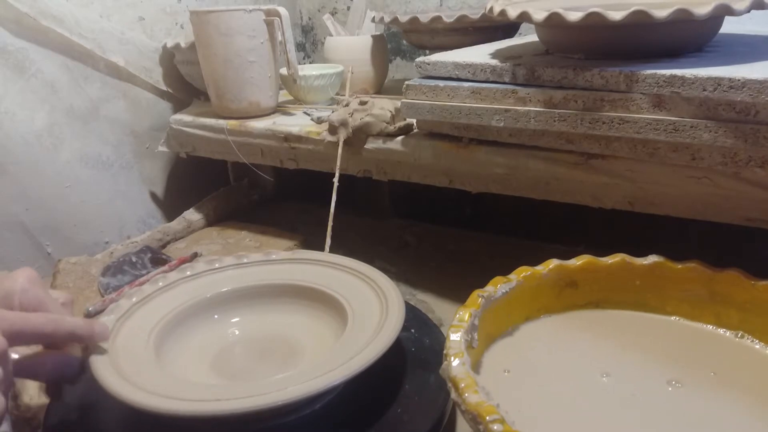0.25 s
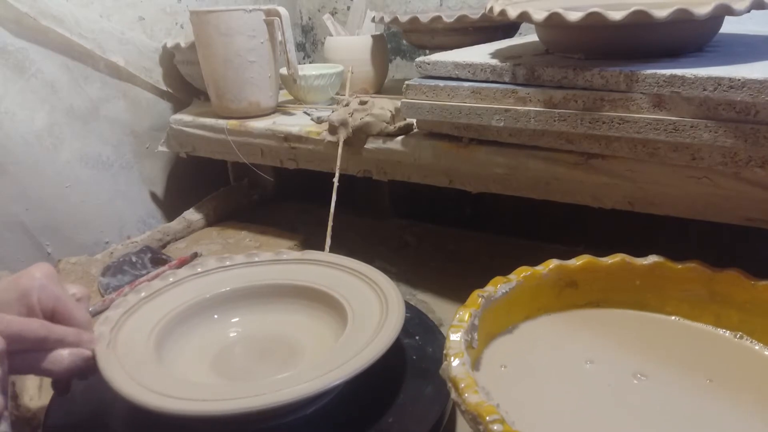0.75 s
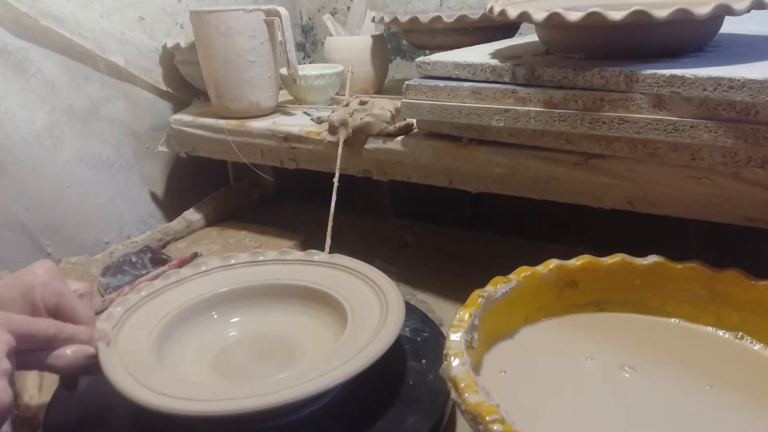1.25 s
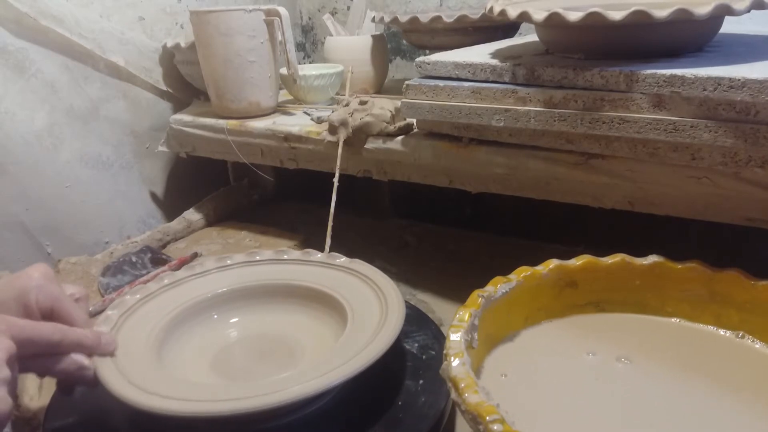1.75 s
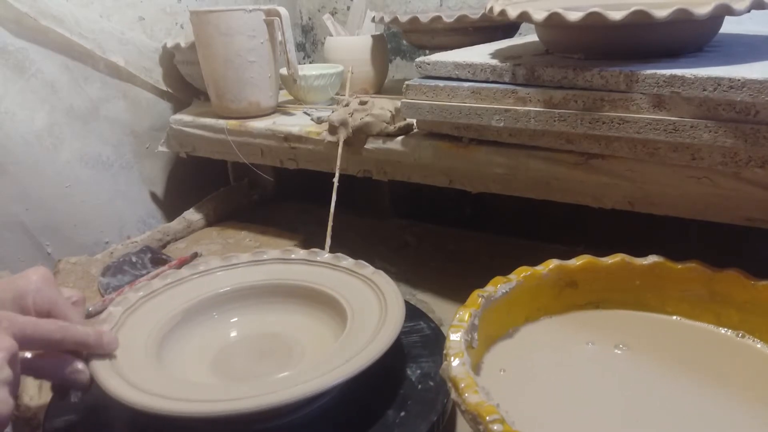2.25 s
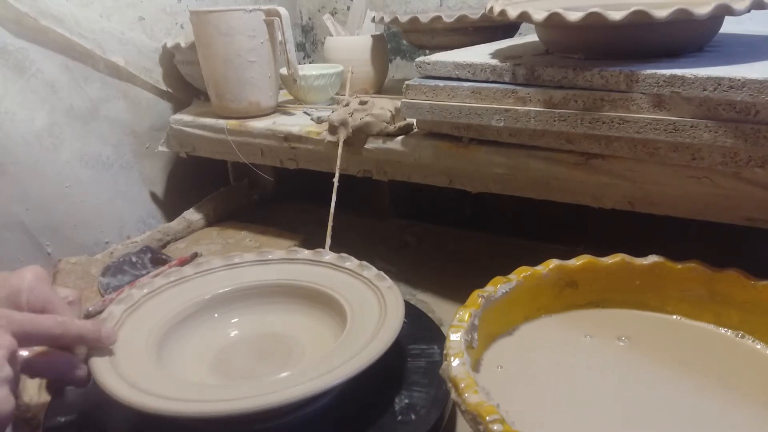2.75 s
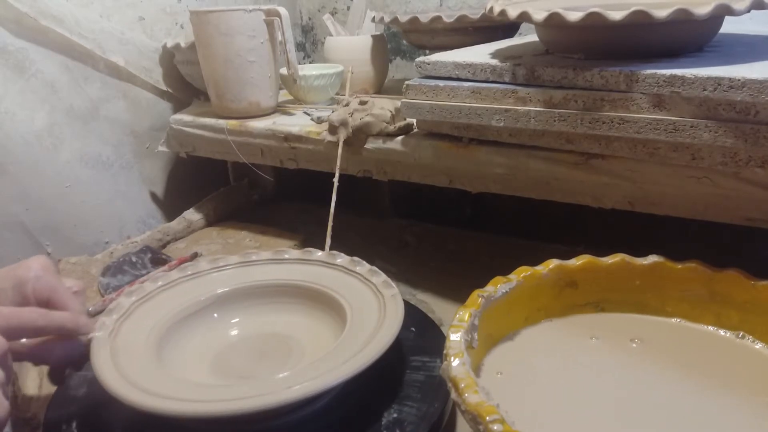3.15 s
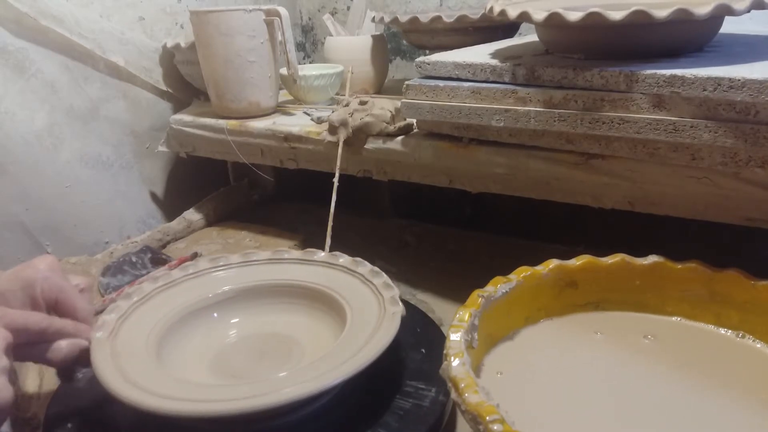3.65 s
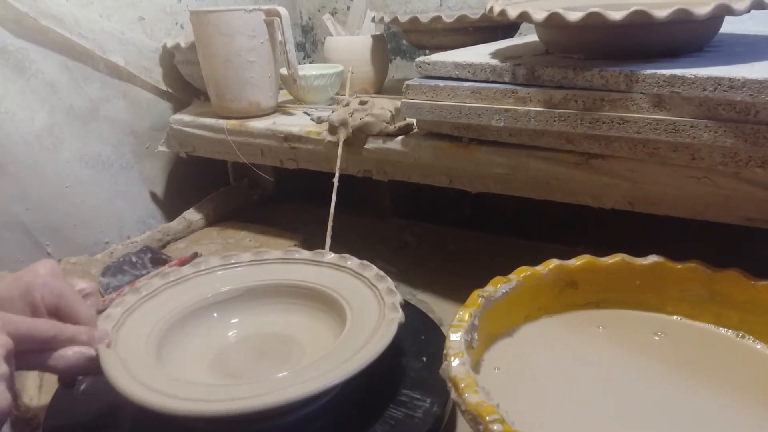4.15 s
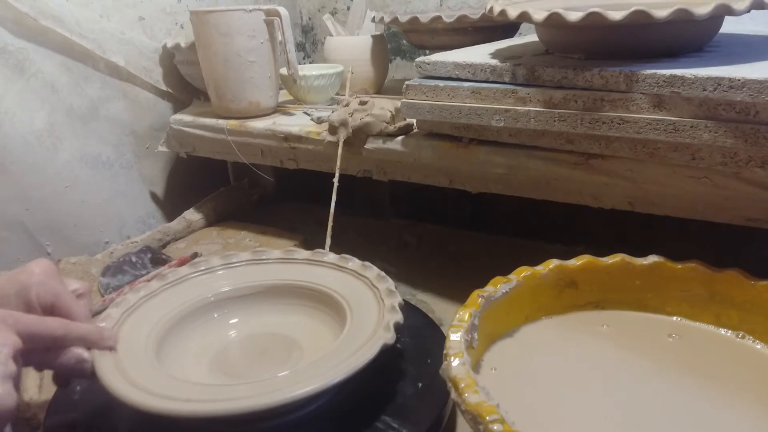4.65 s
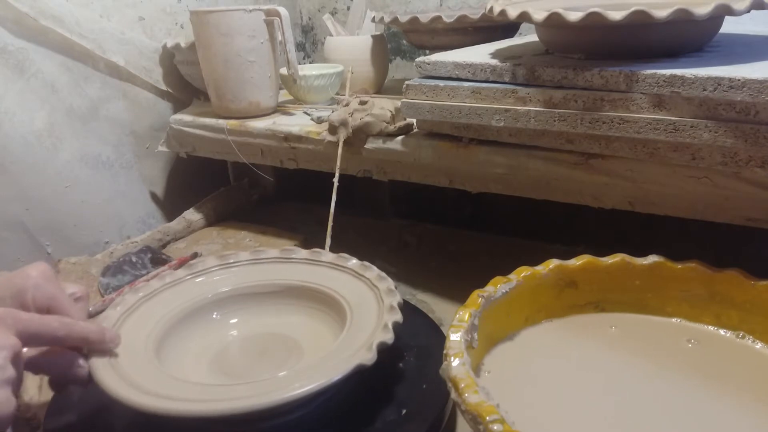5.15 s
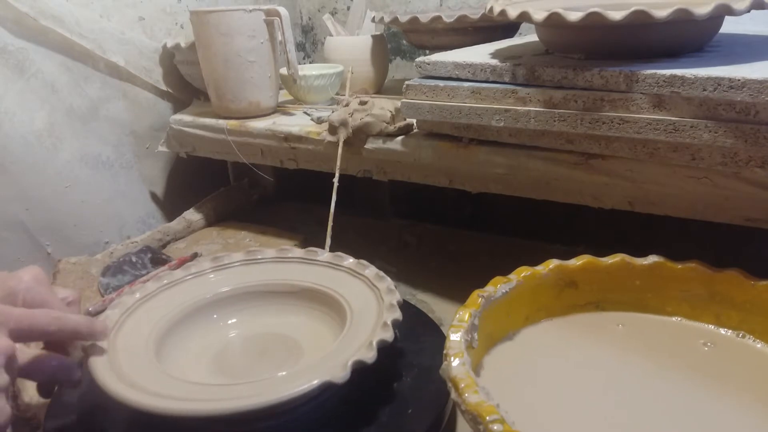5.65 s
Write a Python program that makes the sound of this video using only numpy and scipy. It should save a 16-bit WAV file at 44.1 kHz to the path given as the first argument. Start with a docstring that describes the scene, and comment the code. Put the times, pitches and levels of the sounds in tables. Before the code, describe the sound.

Heard from close above in a small workshop, a pottery wheel's electric motor drones at an even pitch, with rough bearings making its casing ring. Under it lie room noise, the soft hiss of fingers on a wet clay rim and a faint, fast-pulsing squeak. A low rumble shifts with the load, dipping halfway through and then returning, before the squeak and ring peak shortly before the end.

```python
"""An electric motor drives a slowly turning pottery wheel in a small workshop, heard from just above.
From the start, multiples of the shaft rate hum and rough bearings ring the casing over room noise and the
hiss of fingers on wet clay; a faint squeak pulses once a shaft turn. The frame rumbles as the load comes
and goes, easing near 3 s and swelling again from 3.5 s. Near 5.5 s the squeak and the casing peak."""
import sys
import numpy as np
from scipy import signal
from scipy.fft import irfft, next_fast_len
from scipy.io import wavfile
from scipy.ndimage import uniform_filter1d

SR = 44100
rng = np.random.default_rng(int(sys.argv[2]) if len(sys.argv) > 2 else 0)


def master_out(mix):
    """Clip the mix to full scale and print it as 16-bit PCM to the path in sys.argv[1]."""
    frames = np.transpose(np.atleast_2d(mix))
    ceiling = np.clip(frames, -1, 1)
    pcm = np.round(ceiling * 32767).astype(np.int16)
    wavfile.write(sys.argv[1], SR, pcm)


N = 260628
SHAFT_HZ, TOP_HZ = 24.988, 15650
TIME_S = np.arange(N) / SR
FFT_SIZE = next_fast_len(N)
BINS_HZ = np.fft.rfftfreq(FFT_SIZE, 1 / SR)


def undb(db):
    """Gain of a level in dB."""
    return 10 ** (np.asarray(db) / 20)


def curves(table):
    """Level columns of a time table, one value a sample."""
    time_s, *columns = np.transpose(table)
    return [np.interp(TIME_S, time_s, column) for column in columns]


def swings(table):
    """Level curves in dB about their means."""
    return [db - db.mean() for db in curves(table)]


def wander(rate_hz, time_s=TIME_S):
    """Random levels held 1 / rate_hz s and smoothed twice; spread 1."""
    hold = 16
    held = np.repeat(rng.standard_normal(int(N / SR * rate_hz) + 2), hold)
    smooth = uniform_filter1d(uniform_filter1d(held, size=hold), size=hold)
    return np.interp(time_s, np.arange(len(smooth)) / (hold * rate_hz), smooth / smooth.std())


def throb(place_turns, sharpness):
    """Gain that peaks once a shaft turn; rms 1."""
    gain = np.exp(sharpness * np.cos(2 * np.pi * (SHAFT_HZ * TIME_S - place_turns)))
    return gain / np.sqrt(np.mean(gain ** 2))


def white(count):
    """Spectral lines of white noise of rms 1."""
    return np.sqrt(FFT_SIZE / 2) * (rng.standard_normal(count) + 1j * rng.standard_normal(count))


def waveform(spectra):
    """Stereo signal of a pair of spectra."""
    return irfft(spectra, FFT_SIZE)[:, :N]


def resonances(modes):
    """Noise-driven resonances with steep skirts; reflections unlink left and right in the treble."""
    span = int(1500 * FFT_SIZE / SR)  # bins in 1500 Hz
    spectra = np.zeros((2, len(BINS_HZ)), complex)
    for hz, width_hz, left_db, right_db, lead_rad in modes:
        near = np.searchsorted(BINS_HZ, max(hz - 750, 0)) + np.arange(span)
        shape = 1 / (1 + 1j * (BINS_HZ[near] - hz) / (0.79 * width_hz)) ** 2
        shape /= np.sqrt(np.sum(abs(shape) ** 2) / len(BINS_HZ))
        coherence = np.clip(1.4 - hz / 1800, .6, 1)
        left = white(span)
        right = coherence * left + np.sqrt(1 - coherence ** 2) * white(span)
        spectra[0, near] += shape * undb(left_db) * np.exp(1j * lead_rad) * left
        spectra[1, near] += shape * undb(right_db) * right
    return waveform(spectra)


# Background noise density: (frequency [Hz], left [dB/Hz], right [dB/Hz])
NOISE_DENSITY = [(38, -97, -94), (60, -84, -83.5), (100, -81, -79), (130, -79, -79), (260, -73.5, -73.5),
                 (400, -73.5, -74.5), (850, -76, -74), (1450, -81, -80), (2060, -83.5, -81.5),
                 (3140, -91, -90.5), (4060, -92.5, -89.5), (4750, -92, -101), (6040, -97, -107),
                 (7950, -102, -109), (12200, -111, -113), (14200, -114, -114), (14600, -135, -114),
                 (15300, -138, -120)]


def noise_spectra():
    """Background noise: alike left and right in the bass, unrelated above."""
    hz, *sides_db = np.transpose(NOISE_DENSITY)
    colour = np.sqrt(SR / 2) * undb([np.interp(np.log(BINS_HZ + 1), np.log(hz), db) for db in sides_db])
    coherence = np.clip(1.2 - BINS_HZ / 500, 0, .9)
    mid = np.sqrt((1 + coherence) / 2) * white(len(BINS_HZ))
    side = np.sqrt((1 - coherence) / 2) * white(len(BINS_HZ))
    return colour * np.array([mid + side, mid - side])


def highpass(corner_hz):
    """Gain per bin, 36 dB an octave below the corner."""
    return 1 / (1 + (corner_hz / (BINS_HZ + 1)) ** 6)


def room(spectra, rumble_db):
    """Reflected motor noise: the bass swells with the frame, the midrange wavers."""
    bass = 1 / (1 + (BINS_HZ / 480) ** 6)
    midrange = (1 - bass) * (1 - highpass(2600))
    swelling = undb(rumble_db) * waveform(spectra * bass)
    return swelling + undb(0.77 * wander(7.6)) * waveform(spectra * midrange)


# Fingers on the wet rim: (time [s], hiss gain [dB])
FINGER_GAIN = [(.2, 1), (.75, 1), (1.05, 2), (1.4, 0), (1.8, -2), (2.5, -1), (3.3, -1), (3.7, 1.5),
               (4.3, 2), (4.8, -.5), (5.9, -.5)]


def hiss(spectra, rub_db):
    """Fingers hiss on the clay up to about 6 kHz. Above that, faint microphone hiss is nearly steady
    on the right, and the left hiss swells with the rubbing."""
    finger_db, = curves(FINGER_GAIN)
    treble, air = spectra * highpass(2600), highpass(5500)
    fingers = undb(finger_db) * waveform(treble * (1 - air))
    top_hiss = undb(0.33 * finger_db + np.outer([.4, .1], rub_db)) * waveform(treble * air)
    flicker = undb(.6 * wander(12) + .6 * wander(40))
    return flicker * throb(.4, .07) * (fingers + top_hiss)


# Rubbing strength: (time [s], level [dB])
RUB_LEVEL = [(1, 0.5), (1.4, 0), (1.8, -0.5), (2.3, -2.5), (2.6, 0), (3.0, 2), (3.42, 2), (3.55, 0),
             (4, -3.5), (4.4, -1), (4.8, 0), (5.05, 2.5), (5.5, 4.5), (5.9, 2)]
# Rubbing resonances:
# (frequency [Hz], width [Hz], left [dB], right [dB], left lead [rad], place [turns], sharpness [-])
SQUEAK_MODES = [(3605, 37, -73.5, -69.5, 1.6, 0.4, 0.21), (5160, 450, -66, -82, .9, .31, .25),
                (5480, 120, -70, -88, -.5, 0.2, 0.22), (6450, 100, -71.5, -84, 1.6, 0.2, 0.39),
                (6650, 150, -73.5, -87.5, 1.1, 0.4, .35), (7130, 100, -77, -85, .9, .31, .35),
                (9450, 300, -82, -96, -.6, .74, .2), (10260, 200, -78, -93, 1.9, .74, .6),
                (10560, 900, -78, -93, 0, .4, .1), (13350, 600, -79, -94, 1.7, .26, .3)]


def squeak(rub_db):
    """Each rubbing resonance peaks at its place in the turn, louder and sharper the harder it rubs."""
    out = 0
    for *mode, place_turns, sharpness in SQUEAK_MODES:
        gain = undb(1.3 * rub_db + 1.5 * wander(5))
        out += gain * throb(place_turns, sharpness * undb(rub_db)) * resonances([mode])
    return out


# Frame shake, played as swings: (time [s], first boom [dB], second boom [dB], rumble [dB])
FRAME_SHAKE = [(0.0, -41.5, -37, -41), (0.11, -46, -36.5, -45), (0.16, -41, -36.5, -42.5),
               (0.49, -42, -38.5, -41), (0.69, -46, -47, -41.5), (0.76, -43.5, -44, -43.5),
               (0.84, -51.5, -34.5, -42), (0.97, -34.5, -40, -44.5), (1.02, -49, -38.5, -43),
               (1.12, -38.5, -37.5, -40), (1.22, -43.5, -38, -45.5), (1.3, -38.5, -37, -40),
               (1.53, -45.5, -41.5, -46), (1.63, -43, -37, -42), (1.97, -39, -52.5, -44),
               (2.05, -39.5, -52.5, -47), (2.17, -33.5, -50.5, -44.5), (2.27, -43, -51.5, -47.5),
               (2.6, -37.5, -47, -45), (2.65, -43, -47.5, -47), (2.87, -48, -46, -54),
               (2.96, -45, -46, -47), (3.07, -55.5, -43, -49), (3.16, -44, -40.5, -51),
               (3.35, -58.5, -43.5, -48.5), (3.55, -38.5, -33, -44.5), (3.66, -46.5, -41.5, -47),
               (3.84, -35, -39.5, -43), (3.93, -44.5, -37, -38), (4.01, -37.5, -44, -45),
               (4.16, -42.5, -43, -42.5), (4.3, -38.5, -39, -42), (4.85, -45, -43, -43.5),
               (4.95, -43, -46.5, -52.5), (5.01, -50.5, -36, -48), (5.08, -38.5, -41, -47.5),
               (5.54, -53, -41, -46.5), (5.78, -40.5, -47, -50), (5.9, -55, -42.5, -46)]
# Frame resonances: (frequency [Hz], width [Hz], left [dB], right [dB], left lead [rad])
FRAME_MODES = [(150.5, 11.3, -40.5, -43, 0.23), (177.5, 13.7, -42, -42, 0.3),
               (223.4, 21.5, -49.5, -51.5, 0.062), (323.7, 30.6, -50, -54, -0.25),
               (465.4, 35, -50, -53, 1.5)]


def frame(first_boom_db, second_boom_db, rumble_db):
    """Under changing load the wooden frame booms at two low resonances and rumbles above them."""
    first_boom = undb(first_boom_db - 4) * resonances(FRAME_MODES[:1])
    second_boom = undb(second_boom_db - 3) * resonances(FRAME_MODES[1:2])
    return first_boom + second_boom + undb(rumble_db) * resonances(FRAME_MODES[2:])


# Casing ring, played as swings: (time [s], low ring near 600 Hz [dB], high ring near 660 Hz [dB])
CASING_RING = [(0.0, -41.5, -43.5), (0.13, -35.5, -41.5), (0.23, -40, -34.5), (0.62, -37, -41),
               (0.92, -39, -36.5), (1.26, -37, -41.5), (1.36, -37, -33.5), (1.58, -39, -41),
               (1.82, -36.5, -40), (1.94, -38.5, -36), (2.32, -39.5, -41.5), (2.36, -36, -35.5),
               (2.84, -39, -39), (2.91, -34.5, -37.5), (3.11, -35.5, -33.5), (3.29, -37.5, -40.5),
               (3.45, -34, -36.5), (3.65, -39, -39), (3.73, -36, -34), (3.84, -37, -45.5),
               (3.91, -36.5, -37.5), (4.24, -35.5, -36.5), (4.37, -40, -44.5), (4.47, -35, -36.5),
               (4.88, -35, -39), (5.03, -33, -32.5), (5.18, -36.5, -40), (5.27, -38, -32), (5.36, -39, -42),
               (5.59, -31.5, -31.5), (5.73, -34, -40.5), (5.83, -32, -33), (5.9, -36.5, -40)]
# Casing resonances: (frequency [Hz], width [Hz], left [dB], right [dB], left lead [rad])
CASING_MODES = [(545, 33, -53, -48, 2.5), (571.3, 14.7, -56, -42.5, -2.0), (595.7, 16, -38.5, -43.5, -1.5),
                (622.2, 14, -40, -51, -2.5), (645, 15, -36.5, -44, -2.0), (681.8, 26, -40.5, -45, -0.55),
                (721.5, 13, -44.5, -55, 3), (742, 14.4, -53.5, -45, -0.9), (795, 13.7, -48.5, -58, -0.34),
                (860, 37, -56.5, -51, 1.67), (955.7, 45, -52.5, -51.5, 0.36), (1005, 25, -58, -61.5, 0.4),
                (1138, 60, -51, -50.5, -2.5), (1249, 94, -48, -53, 0.48), (1328, 29, -53.5, -48.5, -2),
                (1403, 35, -57, -51.5, -2.5), (1497, 18, -61, -59.5, 0.9), (1588, 37, -49, -46.5, 2.5),
                (1723, 56, -53, -50.5, 1.56), (1848, 25, -55, -63, 1.08), (2029, 80, -56, -57, -2.5),
                (2278, 71, -63.5, -63, 1.5), (2675, 80, -70, -64, -1.97)]


def casing(low_ring_db, high_ring_db):
    """Bearing roughness rings the motor casing, harder once a turn."""
    low_ring = undb(low_ring_db - 0.2) * resonances(CASING_MODES[1:4])
    high_ring = undb(high_ring_db - 1.5) * resonances(CASING_MODES[4:7])
    weak_modes = undb(.6 * wander(9)) * resonances(CASING_MODES[:1] + CASING_MODES[7:])
    return throb(0.091, .3) * (low_ring + high_ring) + throb(0.42, 0.097) * weak_modes


# Deepest tones, played as swings: (time [s], order 2 [dB], order 3 [dB])
DEEP_LEVELS = [(0.0, -55, -58), (0.66, -53, -53.5), (1.03, -56, -56), (1.48, -58.5, -58),
               (1.64, -59.5, -53.5), (1.77, -59, -59.5), (2.38, -63, -54), (2.56, -60.5, -60),
               (3.37, -63.5, -57.5), (3.6, -56, -55.5), (4.24, -53.5, -57.5), (4.98, -66, -56),
               (5.26, -61.5, -58.5), (5.45, -65.5, -49.5), (5.9, -64, -61)]
# Hum tones: (order [shaft multiple, rounded in use], left [dB], right [dB], left lead [rad])
HUM_ORDERS = [(2, -57.5, -60.5, 0), (3, -60.5, -52.5, 0), (4, -71, -67.5, 2.5), (5, -53.5, -53, 0.45),
              (6, -47, -49, 0.1), (7, -48, -47.5, -0.3), (8, -56, -55.5, -0.2), (9, -54.5, -54.5, -0.5),
              (10, -68.5, -59.5, 0), (11, -58, -65, -0.7), (12, -57.5, -52.5, -0.5),
              (13, -53.5, -61.5, -0.5), (14, -66, -58, 0.5), (15, -60.5, -66, -0.7),
              (16, -65.5, -63.5, -1.5), (17, -57, -58.5, -0.5), (18, -52, -54.5, 0.0),
              (19, -56.5, -58, 2.9), (20, -56, -55.5, 2.5), (21, -42, -45, 3), (22, -34.5, -30, 2.5),
              (22.9, -59.5, -46, -2.5), (24, -34.5, -39, -1.0), (25, -46, -48.5, -3.1),
              (26, -36, -46, -2.13), (27, -41.5, -44, -0.33), (28, -51, -55, -0.2), (30, -57.5, -58, 0.3),
              (31, -63.5, -58.5, -0.8)]


def motor_hum(first_boom_db, second_boom_db, rumble_db, low_ring_db, high_ring_db):
    """Tones at multiples of the shaft rate waver; many follow the part that radiates them."""
    order2_db, order3_db = swings(DEEP_LEVELS)
    follow_db = {2: order2_db + .6, 3: order3_db + .8, 6: first_boom_db + 3, 7: second_boom_db + 3,
                 24: low_ring_db - .3, 25: low_ring_db, 26: high_ring_db - .1, 27: high_ring_db - .1}
    follow_db |= {order: rumble_db for order in (5, 8, 9, 11, 13, 15, 16)}
    decimation = 16  # low tones need few samples
    time_s, out = TIME_S[::decimation], 0
    for (order, left_db, right_db, lead_rad), start_turns in zip(HUM_ORDERS, rng.random(len(HUM_ORDERS))):
        order = round(order)
        waver_rad = .08 if order in (2, 3, 21, 22) else .3  # deepest tones and slot tones are steadiest
        phase_rad = 2 * np.pi * (order * SHAFT_HZ * time_s + start_turns) + waver_rad * wander(4, time_s)
        swing_db = follow_db.get(order, np.zeros(N))[::decimation]
        gain = np.sqrt(2) * undb(swing_db + 5.4 * waver_rad * wander(4, time_s))
        left = undb(left_db) * np.cos(phase_rad + lead_rad)
        right = undb(right_db) * np.cos(phase_rad)
        out += gain * np.array([left, right])
    return signal.resample_poly(out, decimation, 1, axis=1)[:, :N]


def scene():
    """Machine, hiss and room, linked by shared level curves."""
    shake_db, ring_db = swings(FRAME_SHAKE), swings(CASING_RING)
    rub_db, = curves(RUB_LEVEL)
    machine = motor_hum(*shake_db, *ring_db) + frame(*shake_db) + casing(*ring_db) + squeak(rub_db)
    spectra = noise_spectra()
    return machine + hiss(spectra, rub_db) + room(spectra, rumble_db=shake_db[2])


def record(dry):
    """The phone cuts the treble above TOP_HZ."""
    return signal.sosfilt(signal.ellip(8, .2, 70, TOP_HZ, fs=SR, output="sos"), dry)


dry = scene()
out = record(dry)
master_out(out)
```